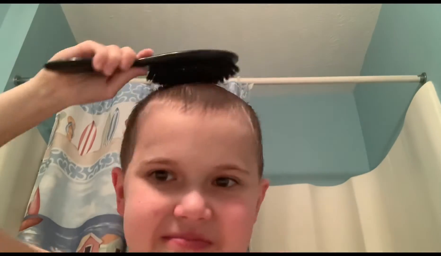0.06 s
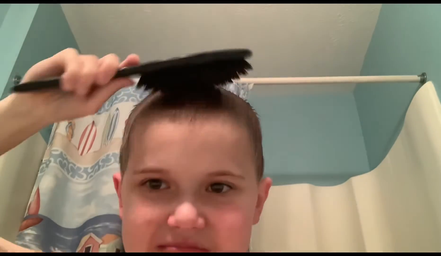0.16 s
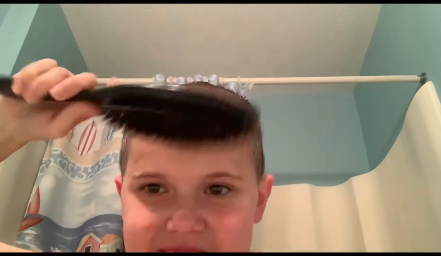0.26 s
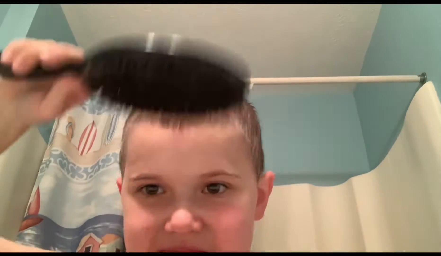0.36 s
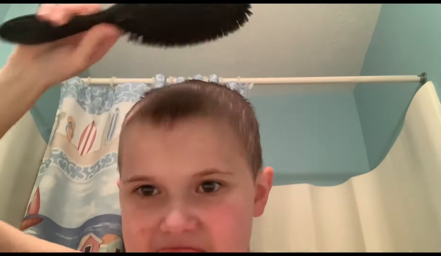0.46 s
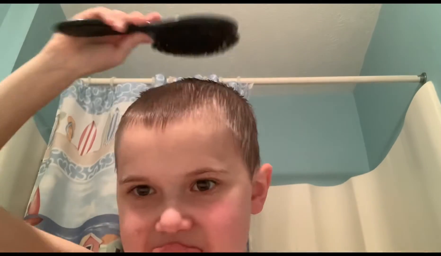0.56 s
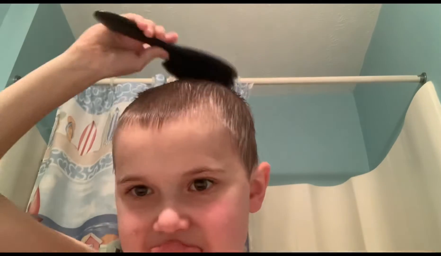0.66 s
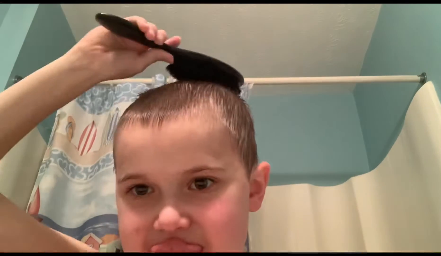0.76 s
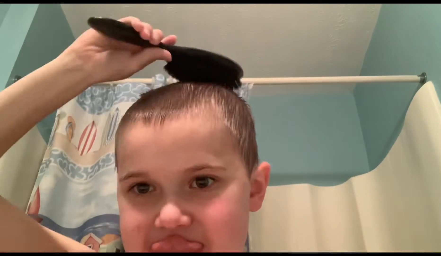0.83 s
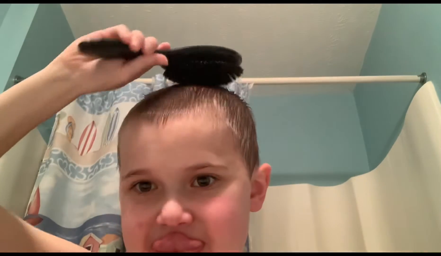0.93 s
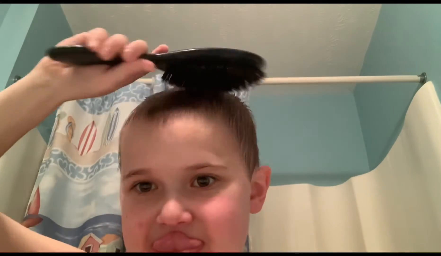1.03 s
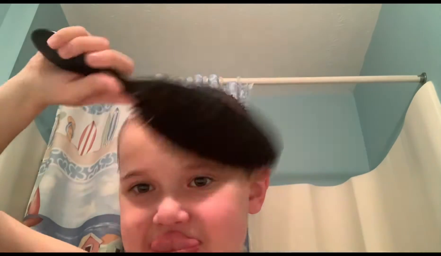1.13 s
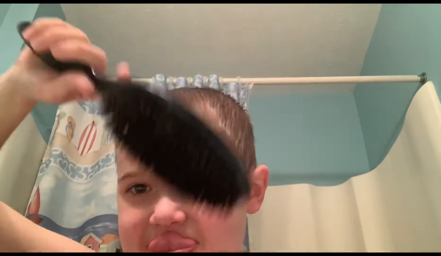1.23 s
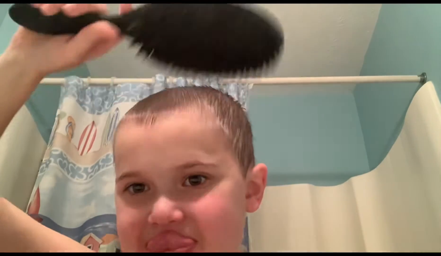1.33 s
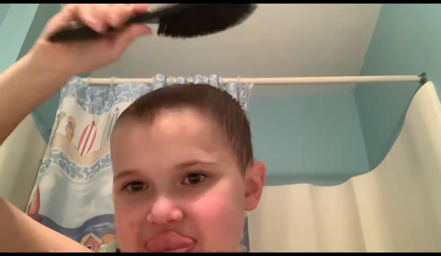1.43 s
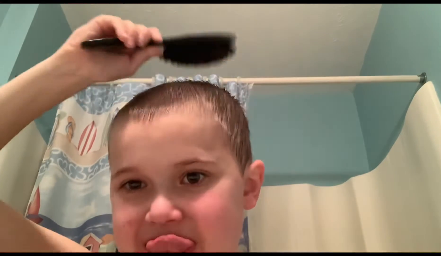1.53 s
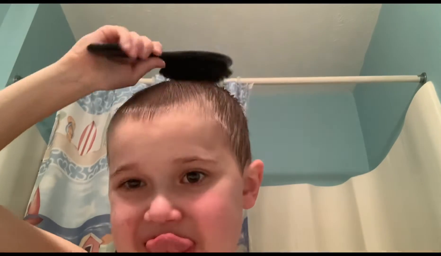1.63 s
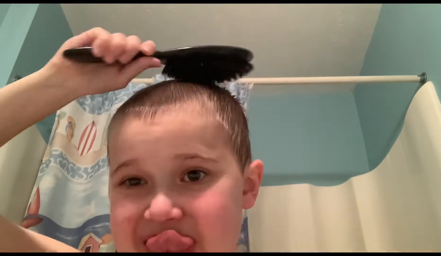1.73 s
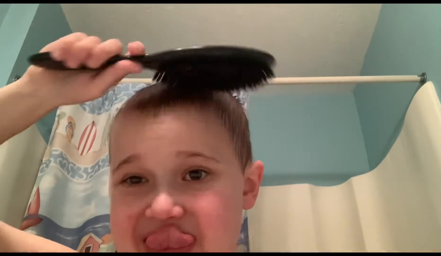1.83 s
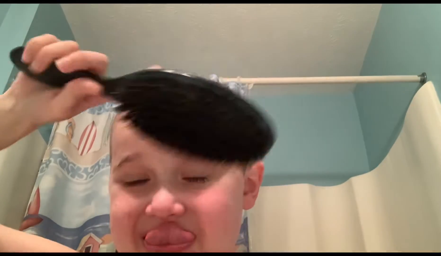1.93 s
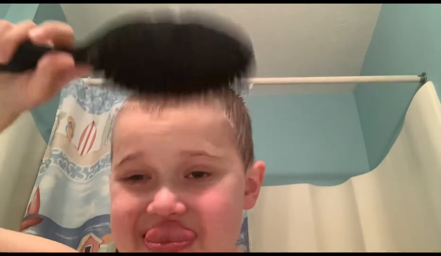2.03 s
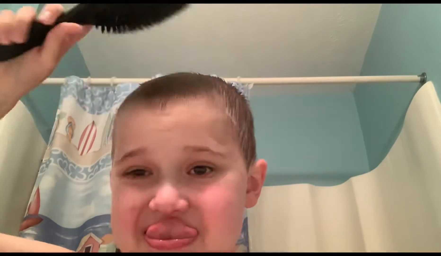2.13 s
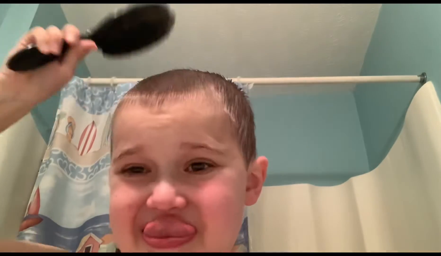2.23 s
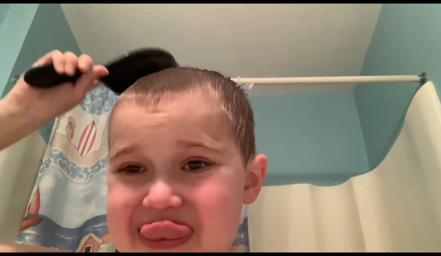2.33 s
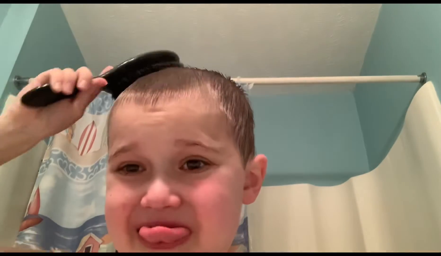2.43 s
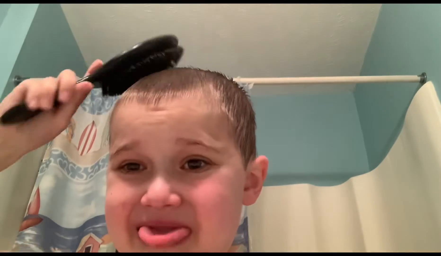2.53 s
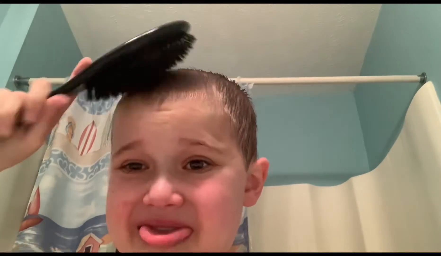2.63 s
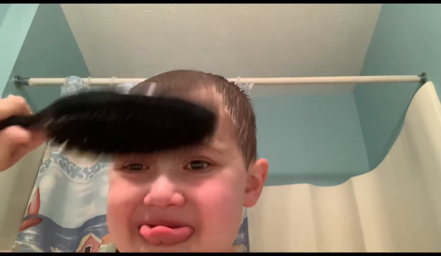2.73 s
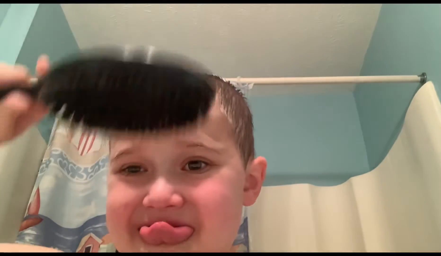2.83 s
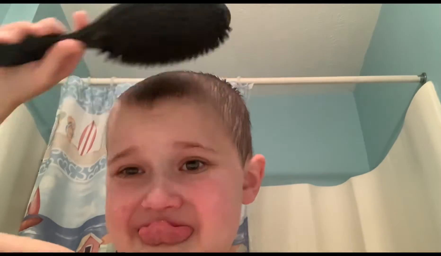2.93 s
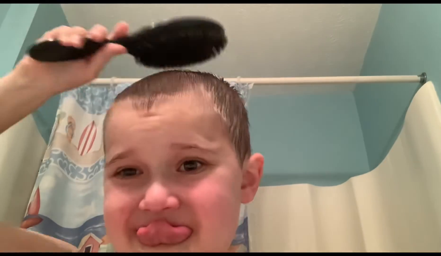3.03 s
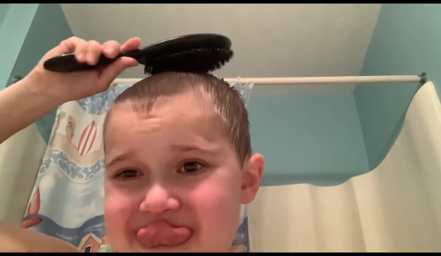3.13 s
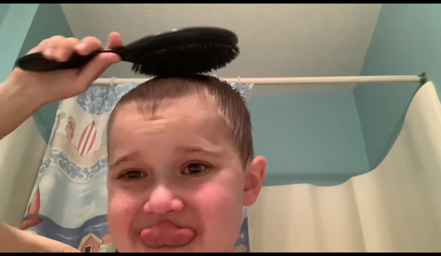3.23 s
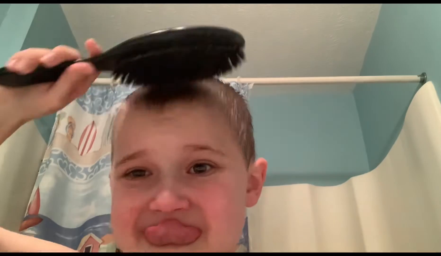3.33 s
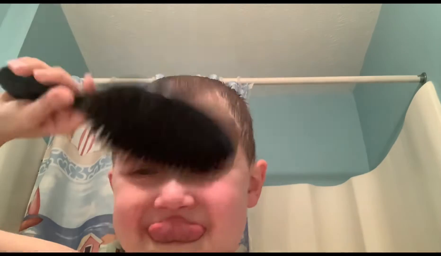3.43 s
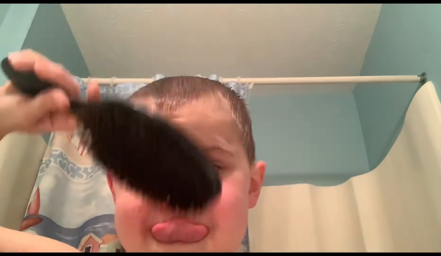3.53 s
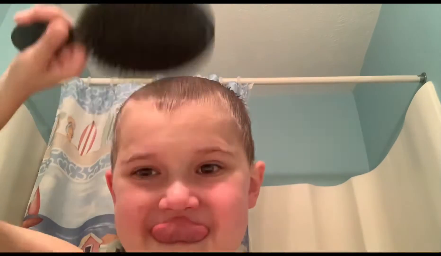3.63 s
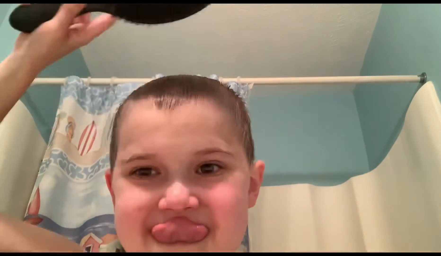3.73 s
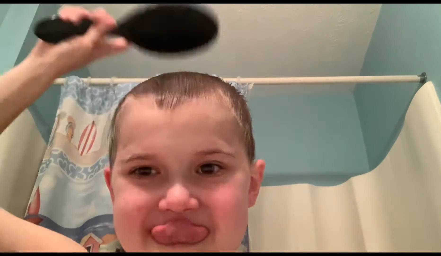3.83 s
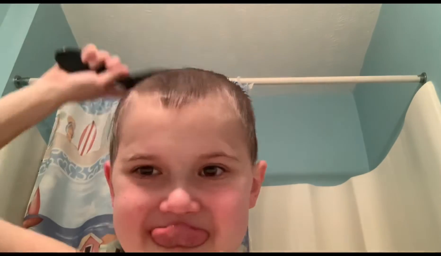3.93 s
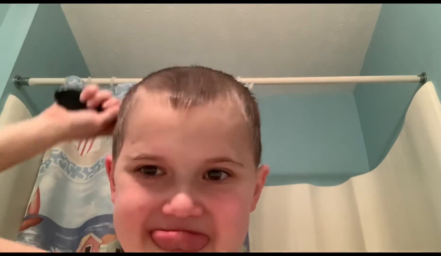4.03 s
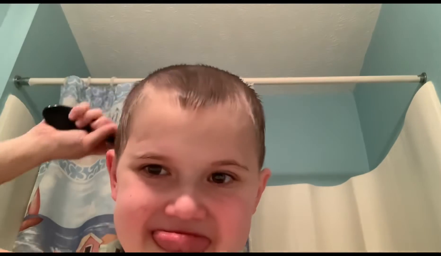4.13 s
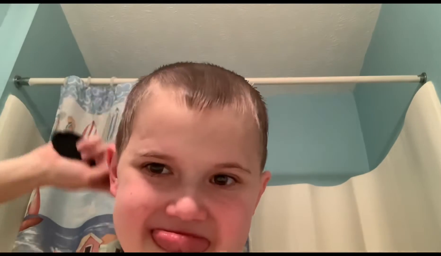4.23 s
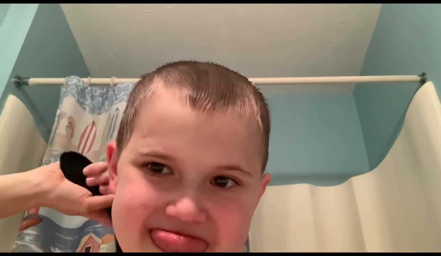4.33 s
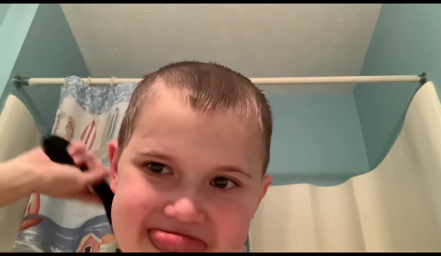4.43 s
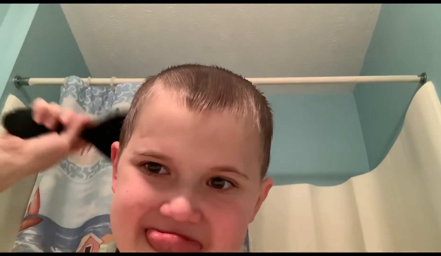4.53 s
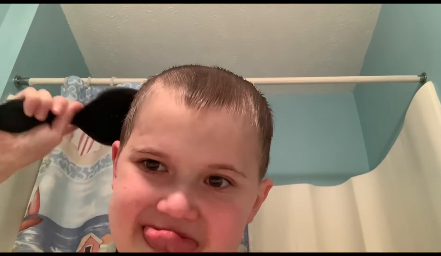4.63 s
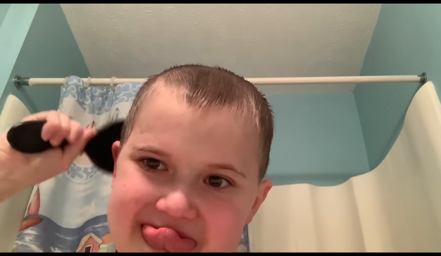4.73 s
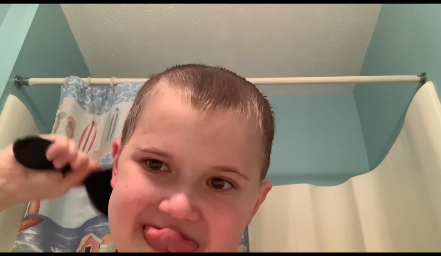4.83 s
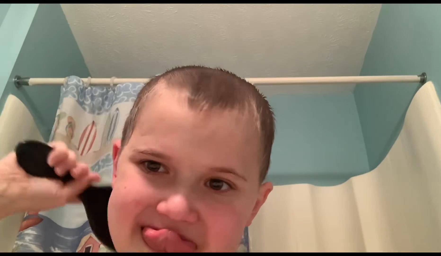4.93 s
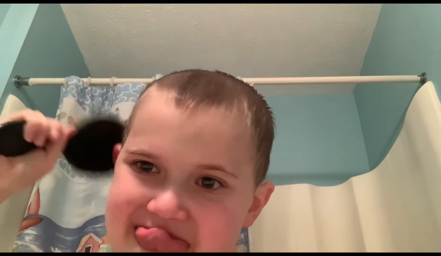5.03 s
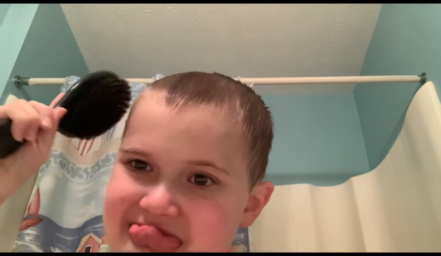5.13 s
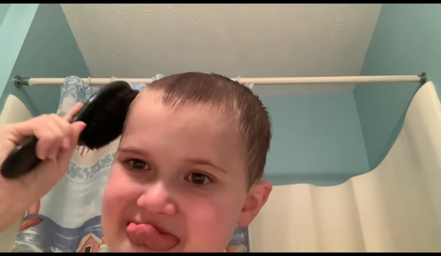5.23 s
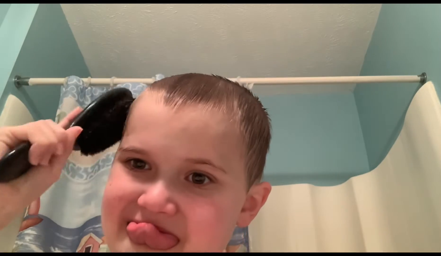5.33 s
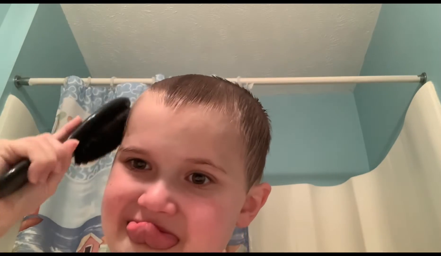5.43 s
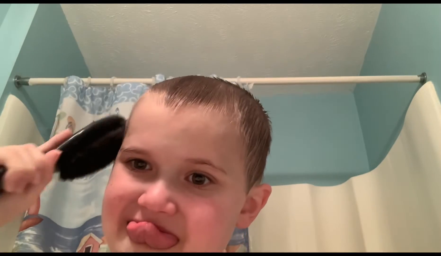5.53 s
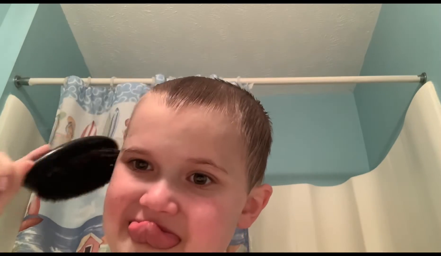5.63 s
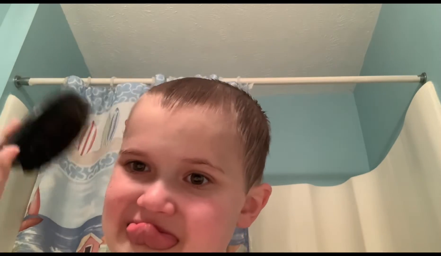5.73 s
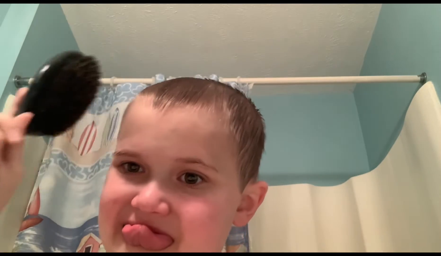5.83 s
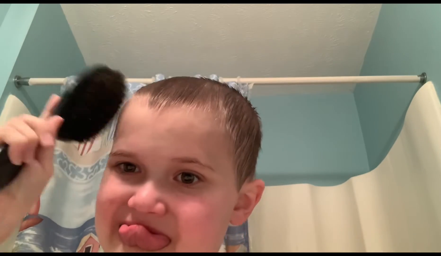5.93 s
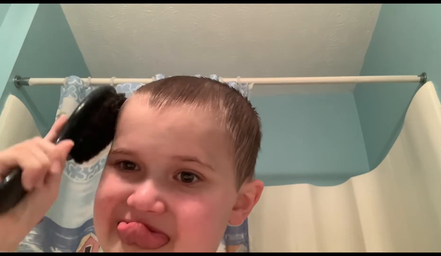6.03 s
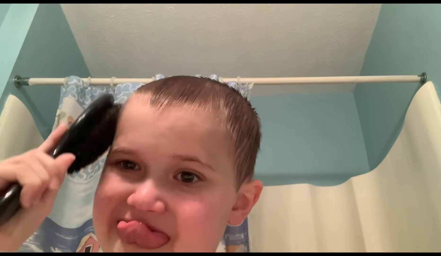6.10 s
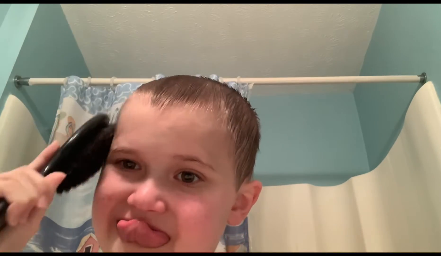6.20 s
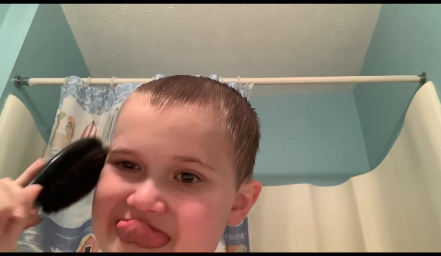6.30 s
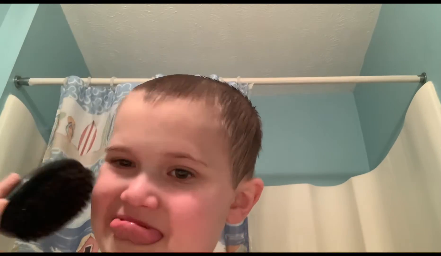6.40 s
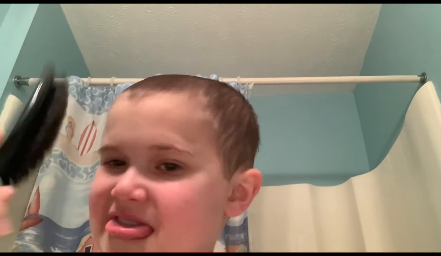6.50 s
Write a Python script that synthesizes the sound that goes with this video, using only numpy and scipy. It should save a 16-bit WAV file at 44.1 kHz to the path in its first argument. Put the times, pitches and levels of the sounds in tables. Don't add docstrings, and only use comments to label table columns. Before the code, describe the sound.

In a small tiled bathroom, a stiff bristle brush lands on short damp hair with a soft crunch, then rasps through it in separate strokes. An elbow bumps the counter hard near the start. The hollow pad rings in the middle pitches and bristles flick free. Later strokes are duller, closer together behind the head. A quiet fan hums under low stand rumble, heard by a close stereo microphone.

```python
import sys
import numpy as np
from scipy import signal
from scipy.fft import rfft, irfft
from scipy.io import wavfile

SR = 44100
rng = np.random.default_rng(int(sys.argv[2]) if len(sys.argv) > 2 else 0)


def dump_mix(stems):
    frames = np.atleast_2d(stems).T
    limited = np.clip(frames, -1, 1)
    pcm = np.round(limited * 32767).astype(np.int16)
    wavfile.write(sys.argv[1], SR, pcm)


def invert_db(x):
    u = np.asarray(x, float) / 20
    return 10 ** u


N = 289254
TIME = np.arange(N) / SR
FREQ = np.maximum(np.fft.rfftfreq(N, 1 / SR), 1)


def rms_one(x):
    return x / np.sqrt(np.mean(x ** 2) + 1e-20)


def at_hz(table, axis=1):
    rows = np.array(table)
    return np.interp(np.log(FREQ), np.log(rows[:, 0]), rows[:, axis])


def coloured(x, spectrum):
    closed = [(spectrum[0][0] * 0.7, -50), *spectrum, (spectrum[-1][0] * 1.1, -50)]
    return rms_one(irfft(rfft(x) * invert_db(at_hz(closed)), N))


def drift(rate_hz):
    lowpass = signal.butter(2, rate_hz, fs=SR, output="sos")
    settled = signal.sosfilt(lowpass, rng.standard_normal(N + SR))[SR:]
    return rms_one(settled)


def resonance(x, hz, width_hz):
    r = np.exp(-np.pi * width_hz / SR)
    feedback = [1, -2 * r * np.cos(2 * np.pi * hz / SR), r * r]
    return signal.lfilter([(1 - r * r) / 2, 0, (r * r - 1) / 2], feedback, x)


def dying(s, db, t60, rise_s):
    t = np.maximum(TIME - s, 0)
    return invert_db(db - 60 * t / t60) * (1 - np.exp(-t / rise_s))


# f/Hz, likeness for the brush/0-1, likeness for the room/0-1, right port lag/rad
PORT_LIKENESS = [(60, .75, .65, -.3), (170, .68, .6, .3), (500, .35, .1, -.3), (1200, .5, .15, -.3),
                 (3000, .3, .05, -.4), (5000, .15, .05, 0), (6400, .4, .42, 2.0), (7300, .68, .68, 2.4),
                 (8000, .9, .93, 2.95), (8600, .99, .99, 3.14), (9500, .99, .99, 3.14),
                 (10000, .9, .95, 3.3), (10700, .78, .74, 4.05), (11500, .72, .68, 4.8),
                 (12400, .76, .7, 5.7), (12900, .999, .999, 6.28)]


def ports(pair, axis):
    alike = np.clip(at_hz(PORT_LIKENESS, axis), 0, 0.999)
    left, own = rfft(pair)
    shared = alike * left * np.exp(-1j * at_hz(PORT_LIKENESS, axis=3))
    right = shared + np.sqrt(1 - alike ** 2) * own
    return np.array([pair[0], irfft(right, N)])


# f/Hz, level/dB per Hz
FAN_AIR = [(25, 5.5), (60, -0.5), (170, -14), (350, -6), (860, -11), (2000, -15), (5000, -19.5),
           (9500, -16.5), (13000, -20.5), (15500, -20.5)]
# t/s, length/s, f/Hz, level/dB
PIPE_TONES = [
    (3.032, 0.081, 665, -64.5),
    (3.633, 0.16, 541, -63.5),
]
AIR_DB, HUM_HZ, HUM_DB = -60, 121, -52.5


def fan():
    air = invert_db(AIR_DB + 0.49 * drift(2.3)) * coloured(rng.standard_normal((2, N)), FAN_AIR)
    hum_phase = 2 * np.pi * HUM_HZ * TIME + 0.36 * drift(3.6)
    hum = invert_db(HUM_DB + 1.94 * drift(4.6)) * np.sin(hum_phase)
    pipes = np.zeros(N)
    for s, length, hz, db in PIPE_TONES:
        swell = np.sqrt(np.sin(np.pi * np.clip((TIME - s) / length, 0, 1)) + 1e-9)
        tone = np.sin(2 * np.pi * hz * TIME + 0.45 * drift(9.9))
        pipes += invert_db(db + 2 + 2 * drift(25)) * tone * swell
    return ports(air, axis=2) + hum + pipes * invert_db([[1.0], [-1.0]])


# strongest t/s, rumble level/dB, length/s, rustle re rumble/dB,
# share of the deepest part/0-1
ARM_SURGES = [(0.0, -45, 0.018, -16, 0.2), (0.236, -40.5, 0.12, 4.5, .12), (0.8, -46, 0.024, -12, 0.1),
              (1.35, -47.5, 0.049, -22, .2), (1.70, -59, 0.034, -24, 0.4), (2.493, -55, 0.031, -8, 0.8),
              (3.983, -48.5, 0.048, -6.5, 0.3), (4.057, -39.5, 0.056, -12, 0.1),
              (4.187, -39.5, 0.18, -6.5, 0.1), (4.36, -54, 0.063, -9, 0.8), (4.92, -48, 0.041, -11, 0.94),
              (5.054, -64, 0.037, -21, 0.6), (5.35, -43.5, 0.094, -26, 0.97),
              (5.676, -56.5, 0.056, -29, 0.5), (5.968, -43.5, 0.11, -41, 1), (6.046, -41, 0.033, -18, 0.2),
              (6.21, -55, 0.078, -27, 0.98), (6.42, -40.5, 0.082, -46, 0.8), (6.55, -43.5, 0.12, -11, 0.35)]
REST_DB, REST_RUSTLE_DB, REST_DEEP = -57, -10.5, 0.2
SURGE_RISE = 0.45


def rumble():
    white = rng.standard_normal((3, 2, N))
    low = rms_one(resonance(resonance(white[0], 41.4, 22), 40, 40))
    high = rms_one(resonance(resonance(white[1], 53.0, 46), 99.6, 46))
    rustle = rms_one(resonance(resonance(white[2], 87, 93), 215, 190))
    swells = [(invert_db(REST_DB) * np.ones(N), REST_RUSTLE_DB, REST_DEEP)]
    for s, db, length, rustle_db, deep in ARM_SURGES:
        spread = np.where(TIME < s, SURGE_RISE * length, length)
        swells.append((invert_db(db) * np.exp(-((TIME - s) / spread) ** 2), rustle_db, deep))
    gains = np.zeros((3, N))
    for swell, rustle_db, deep in swells:
        gains += np.outer([np.sqrt(deep), np.sqrt(1 - deep), invert_db(rustle_db)], swell)
    return invert_db(2.23 * drift(2.8)) * (gains[0] * low + gains[1] * high + gains[2] * rustle)


# t/s, peak level/dB, f/Hz, t60/s
STAND_SWINGS = [
    (0.2052, -10.5, 82, 0.086),
    (.2065, -21, 155, 0.093),
    (0.253, -21.5, 75.7, 0.34),
    (0.791, -37, 71, 0.13),
    (1.2926, -18, 105, 0.032),
    (3.951, -37.5, 120.9, 1),
    (4.19, -25, 111, 0.066),
    (5.87, -37.5, 62.7, 0.54),
]


def bumps():
    lag_s = np.array([[0.0008], [0]])
    out = np.zeros((2, N))
    for s, db, hz, t60 in STAND_SWINGS:
        out += np.sin(2 * np.pi * hz * (TIME - s - lag_s)) * dying(s, db, t60, rise_s=0.0032)
    return out


# t/s, peak level/dB, f/Hz, half length/cycles, buzz re peak/dB
COUNTER_KNOCKS = [
    (0.197, -9.5, 413, 1.1, -12),
    (.203, -19, 225, 0.99, -10),
    (1.265, -30.5, 820, 0.6, -15),
    (2.046, -16.5, 853, 0.73, -17.5),
    (3.477, -43.5, 332, 2, 1.5),
    (5.2, -53, 446, 2.2, 4.5),
]
KNOCK_PAN_DB = -5.5
BUZZ_TOP, BUZZ_T60_S = 1.365, 0.28


def knocks():
    out = np.zeros((2, N))
    pan = invert_db(np.array([[KNOCK_PAN_DB], [-KNOCK_PAN_DB]]) / 2)
    for s, db, hz, cycles, buzz_db in COUNTER_KNOCKS:
        bell = np.exp(-((TIME - s) * hz / cycles) ** 2)
        click = invert_db(db) * np.cos(2 * np.pi * hz * (TIME - s)) * bell
        top_hz = BUZZ_TOP * hz
        band = signal.butter(6, [top_hz * 0.2, top_hz], "band", fs=SR, output="sos")
        buzz = rms_one(signal.sosfilt(band, rng.standard_normal((2, N))))
        out += click * pan + buzz * dying(s, db + buzz_db, BUZZ_T60_S, rise_s=0.00067)
    return out


ROOM_T60_S, ROOM_DB = 0.19, -12


def tiles(x):
    t = TIME[:SR // 2]
    tail = rng.standard_normal((2, len(t))) * invert_db(-60 * t / ROOM_T60_S) * (t > 0.004)
    tail = signal.lfilter([0.25], [1, -0.75], tail)
    tail /= np.sqrt(np.sum(tail ** 2) / 2)
    return invert_db(ROOM_DB) * signal.fftconvolve(x, tail, axes=1)[:, :N]


BEHIND_S = 4.3


def shaded(x):
    behind = TIME > BEHIND_S
    x = x - 0.76 * behind * resonance(x, 11450, 870)
    return x - 0.39 * behind * resonance(x, 10200, 750)


def slips(per_s, spread_db, clump_db):
    sizes = invert_db(spread_db * np.minimum(rng.exponential(1, (2, N)), 4)) * rng.choice([-1, 1], (2, N))
    happens = rng.random((2, N)) < per_s / SR
    return rms_one(sizes * happens * invert_db(clump_db * drift(51)))


# t/s, pad peak level/dB, bristle crunch re pad/dB, t60/s
BRUSH_LANDINGS = [(0.0, -36.5, -17, 0.17), (0.7758, -42.5, -16, 0.26), (1.6779, -29.5, -22.5, 0.1),
                  (2.4687, -36.5, -18.5, 0.16), (3.1754, -42, -17, 0.052), (4.1011, -47.5, -15.5, 0.35),
                  (4.6292, -49, -14, 0.18), (4.7335, -54.5, -11, 0.07), (5.0729, -68, -13, 0.16),
                  (5.183, -66, -12, 0.1), (5.2925, -51, -10, 0.14), (6.0343, -37.5, -7.5, 0.13)]
# f/Hz, width/Hz, level/dB
BACK_MODES = [(640, 190, -11.5), (1600, 530, -13), (2040, 310, -21), (4500, 900, -22)]
TAP_DB = -10
TOUCH_LEAD_S = 0.0042


def taps():
    clicks = np.zeros((2, N)) + 1e-18
    for s, db, crunch_db, t60 in BRUSH_LANDINGS[1:]:
        clicks[:, round(s * SR)] = invert_db(db + TAP_DB)
    folding = np.zeros(N)
    for s, db, crunch_db, t60 in BRUSH_LANDINGS:
        folding += dying(s - TOUCH_LEAD_S, db + 0.55 * crunch_db + 6, 1.6 * t60, rise_s=0.00089)
    chatter = slips(900, spread_db=5.0, clump_db=2.5)
    back = np.zeros((2, N))
    for hz, width, db in BACK_MODES:
        back += invert_db(db) * rms_one(resonance(resonance(chatter, hz, width), hz, 2 * width))
    return 3.0 * resonance(clicks, 1200, 1000) + folding * back


def sweep(start, top, end, power, fade):
    speed = np.clip((TIME - start) / (top - start), 0, 1)
    contact = np.sin(np.pi / 2 * np.clip((end - TIME) / (end - top), 0, 1))
    return speed ** power * contact ** fade


# start t/s, fastest t/s, rasp level/dB,
# bright tips re rasp/dB, pad ring re rasp/dB
HAIR_PULLS = [(0.08, 0.3, -40, 1.5, 7), (0.768, 0.771, -67, -4, -6), (0.913, 1.137, -43.5, 0.5, 4),
              (1.747, 1.934, -41.5, 2, 4.5), (2.55, 2.727, -37, -1.2, -1), (3.2, 3.318, -54.5, -6, 4),
              (3.247, 3.458, -39.5, 0, 0.3), (4.174, 4.356, -38.5, -7, -2), (4.634, 4.645, -56, -3, 0),
              (4.756, 4.886, -37.5, -3.5, -4), (5.06, 5.092, -45, 1, 0), (5.167, 5.184, -55, 13, -3.5),
              (5.30, 5.42, -78, 4, 13), (5.396, 5.671, -41.5, -2, -0.5), (5.83, 5.933, -71.5, -8, 8.5),
              (6.054, 6.205, -48, -11, 0), (6.156, 6.278, -55, -4, 5.5), (6.274, 6.391, -41, -5, 0.5),
              (6.446, 6.568, -52.5, -15, -5)]
RASP_POWER, TIPS_POWER, RING_POWER, DRAG_POWER = 1.33, 2.58, 0.82, 1.03
RASP_FADE, TIPS_FADE, RING_FADE, DRAG_FADE = 2.39, 2.8, 3.44, 3.8
SETTLE_RASP_DB, SETTLE_TIPS_DB, SETTLE_RING_DB, SETTLE_DRAG_DB = 1.5, -7.5, -15.0, -20.5
SETTLE_STRETCH = 1.66
CREEP_DB, CREEP_LEAD = -19.5, 0.22
LIFT_S, LIFT_PER_PULL = 0.087, 0.23
RING_LEAD_S, DRAG_DB = 0.034, -11.5
PRESS_DB, PRESS_HOLD = -9, 0.68
GRIP_DB, GRIP_HZ = 2, 9.9


def stroke_levels():
    rasp, tips, ring, drag = np.zeros((4, N))
    for start, top, db, tips_db, ring_db in HAIR_PULLS:
        pull_s = top - start
        end = top + LIFT_S + LIFT_PER_PULL * pull_s
        creep = invert_db(CREEP_DB) * sweep(start - CREEP_LEAD * pull_s, top, end, 0.43, RASP_FADE)
        rasp += invert_db(db) * (sweep(start, top, end, RASP_POWER, RASP_FADE) + creep)
        tips += invert_db(db + tips_db) * (sweep(start, top, end, TIPS_POWER, TIPS_FADE) + invert_db(-0.5) * creep)
        ring_top = max(top - RING_LEAD_S, (start + top) / 2)
        ring += invert_db(db + ring_db) * sweep(start, ring_top, end, RING_POWER, RING_FADE)
        drag += invert_db(db + DRAG_DB) * sweep(start, top, end, DRAG_POWER, DRAG_FADE)
    for s, db, crunch_db, t60 in BRUSH_LANDINGS:
        touch = s - TOUCH_LEAD_S
        settling = dying(touch, db, SETTLE_STRETCH * t60, rise_s=0.0012)
        rasp += invert_db(crunch_db + SETTLE_RASP_DB) * settling
        tips += invert_db(crunch_db + SETTLE_TIPS_DB) * settling
        ring += invert_db(db + PRESS_DB) * sweep(touch, s, s + PRESS_HOLD * t60, 0.28, 1.7)
        ring += invert_db(SETTLE_RING_DB) * dying(s, db, 5.7 * t60, rise_s=0.0022)
        drag += invert_db(SETTLE_DRAG_DB) * dying(touch, db, 1.3 * t60, rise_s=0.002)
    return rasp, tips, ring * invert_db(GRIP_DB * drift(GRIP_HZ)), drag


# f/Hz, width/Hz, level/dB
PAD_MODES = [(1027, 130, -12.5), (1108.7, 45, 4.5), (1181, 50, 2.5), (1410, 630, -3)]


def pad(drive):
    modes = sum(invert_db(db) * resonance(drive, hz, width) for hz, width, db in PAD_MODES)
    cluster = signal.butter(2, [960, 1320], "band", fs=SR, output="sos")
    return signal.sosfilt(cluster, modes)


def patchy(x, depth_db, rate_hz):
    edges = [20, 1400, 2000, 2800, 4000, 5600, 8000, 11500, 13500, 20000]
    spectrum = rfft(x)
    out = np.zeros((2, N))
    for low, high in zip(edges, edges[1:]):
        part = irfft(spectrum * (FREQ >= low) * (FREQ < high), N)
        out += invert_db(depth_db * drift(rate_hz)) * part
    return out


# t/s, peak level/dB, length/s
TUFT_FLICKS = [
    (0.191, -22.5, 0.001),
    (0.2, -28.5, 0.004),
    (1.967, -25, 0.0044),
    (3.467, -14, 0.0042),
    (0.5095, -47, 0.0012),
    (0.902, -47, 0.0059),
    (1.5299, -52, 0.0012),
    (1.78, -53, 0.00088),
    (2.3431, -45, 0.00098),
    (5.0718, -29, 0.0015),
]
# f/Hz, width/Hz, level/dB
BRISTLE_MODES = [(2010, 120, -16), (3160, 73, -19.5), (4060, 580, -17.5), (6750, 1050, -9)]
# f/Hz, level/dB per Hz
RASP_SPECTRUM = [(450, -16), (700, -6), (900, -7), (1500, -1), (2100, 1), (3000, 0), (4600, -1), (6500, 0),
                 (7600, -1), (8600, -7), (9600, -16)]
# f/Hz, level/dB per Hz
TIPS_SPECTRUM = [(7600, -18), (8600, -6), (9800, -2), (11000, 0), (13500, 0), (15000, -2), (15900, -5)]


def brush():
    rasp, tips, ring, drag = stroke_levels()
    pressed, crunch, sprung = np.zeros((3, N))
    for s, db, crunch_db, t60 in BRUSH_LANDINGS:
        pressed += dying(s, db, t60, rise_s=0.00019)
        crunch += dying(s, db + crunch_db, t60, rise_s=0.0014)
    for s, db, length in TUFT_FLICKS:
        bell = np.exp(-0.5 * ((TIME - s - length) / length) ** 2)
        sprung += invert_db(db - 10) * (0.007 / length) ** 0.22 * bell

    fine = slips(14000, spread_db=2.0, clump_db=1.2)
    coarse = slips(2500, spread_db=4.5, clump_db=1.5)
    fizz = slips(14000, spread_db=4.5, clump_db=0.26)
    twang = np.zeros((2, N))
    for hz, width, db in BRISTLE_MODES:
        twang += invert_db(db + 2 * drift(9.6)) * rms_one(resonance(coarse, hz, width))

    rasp_gain = invert_db(-0.5) * rasp + invert_db(-33) * crunch + invert_db(-16) * sprung
    hiss = coloured(fine, RASP_SPECTRUM) * rasp_gain + twang * rasp
    hiss += invert_db(-9) * crunch * rms_one(resonance(fine, 1500, 2300))
    hiss += coloured(fizz, TIPS_SPECTRUM) * (invert_db(2) * tips + invert_db(-23) * crunch + sprung)

    drive = coarse * (invert_db(-3.2) * ring + invert_db(-7.5) * pressed)
    for s, db, crunch_db, t60 in BRUSH_LANDINGS:
        drive[:, round(s * SR)] += invert_db(db + 16)
    ringing = pad(drive) / np.std(pad(coarse))

    drag = np.minimum(drag, invert_db(11) * rasp)
    dull = invert_db(0.5) * drag * rms_one(resonance(resonance(coarse, 620, 236), 587, 730))
    return patchy(hiss, depth_db=2.06, rate_hz=9.1) + ringing + dull


def scene():
    background = fan() + ports(rumble(), axis=1) + bumps()
    hits = knocks()
    near = shaded(brush() + taps())
    return background + hits + invert_db(-0.5) * tiles(hits) + ports(near + tiles(near), axis=1)


def low_pass(x):
    return signal.sosfilt(signal.butter(12, 16480, fs=SR, output="sos"), x)


def record(dry):
    top_edge = signal.cheby2(14, 60, 16150, fs=SR, output="sos")
    roll_off = signal.butter(2, 28, "high", fs=SR, output="sos")
    mix = signal.sosfilt(roll_off, signal.sosfilt(top_edge, dry))
    return low_pass(mix)


dry = scene()
out = record(dry)
dump_mix(out)
```